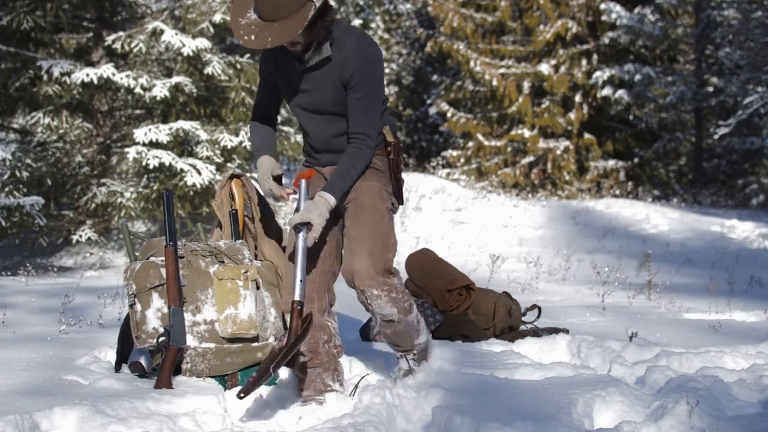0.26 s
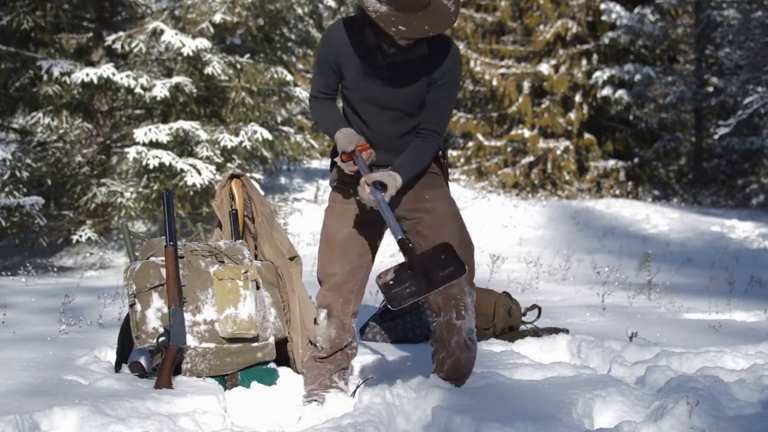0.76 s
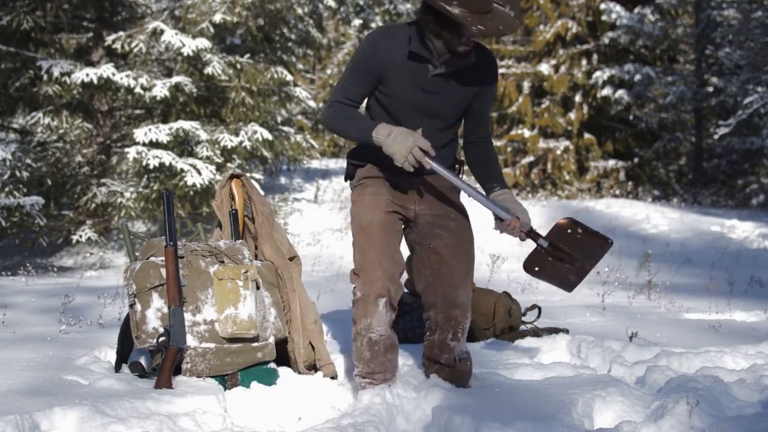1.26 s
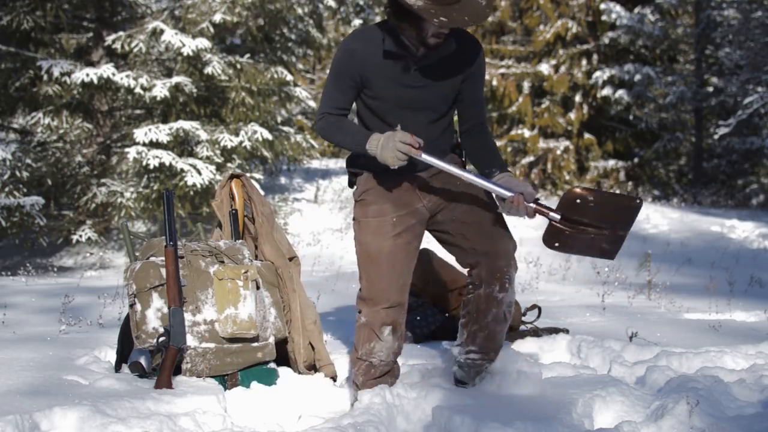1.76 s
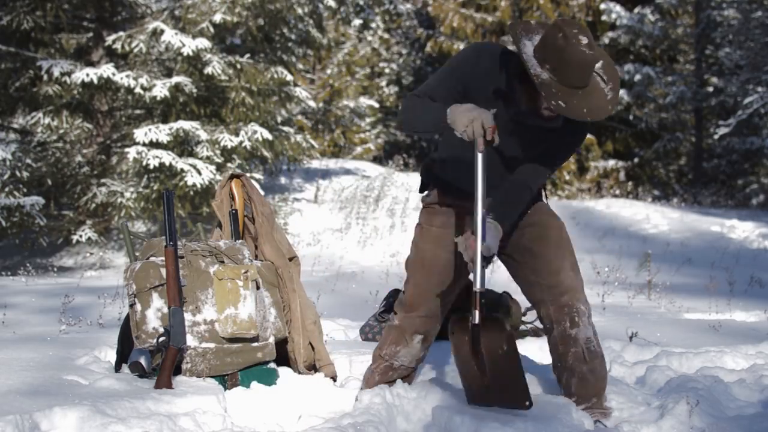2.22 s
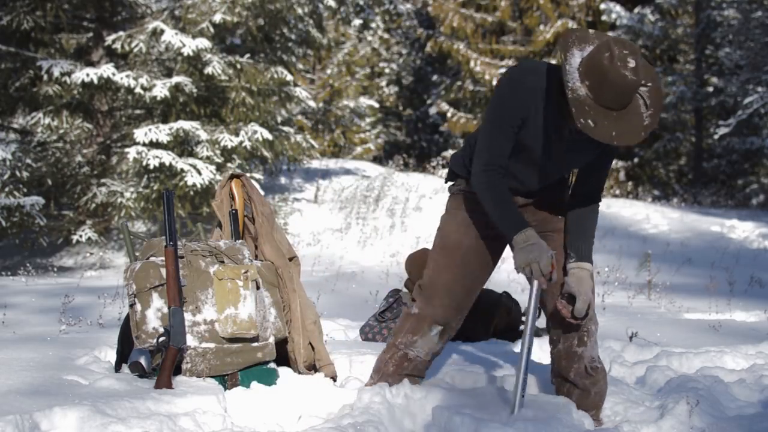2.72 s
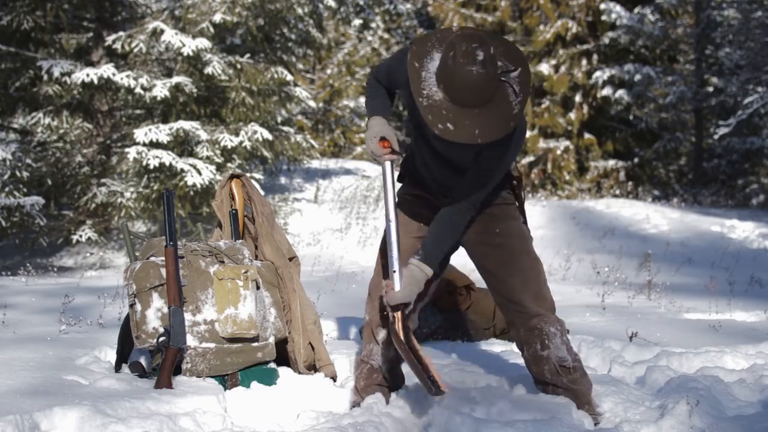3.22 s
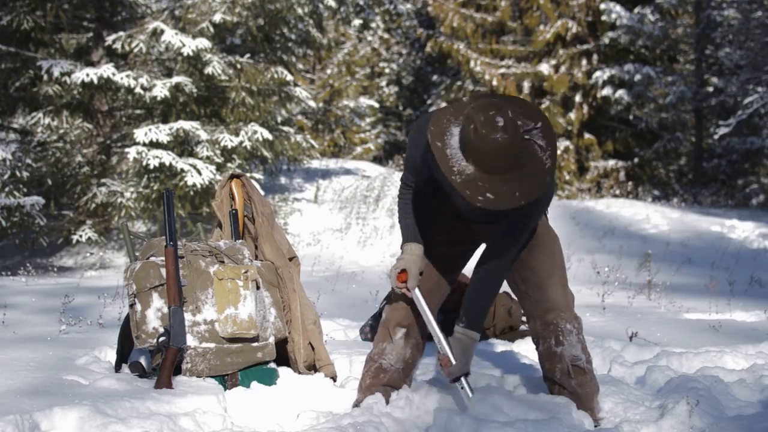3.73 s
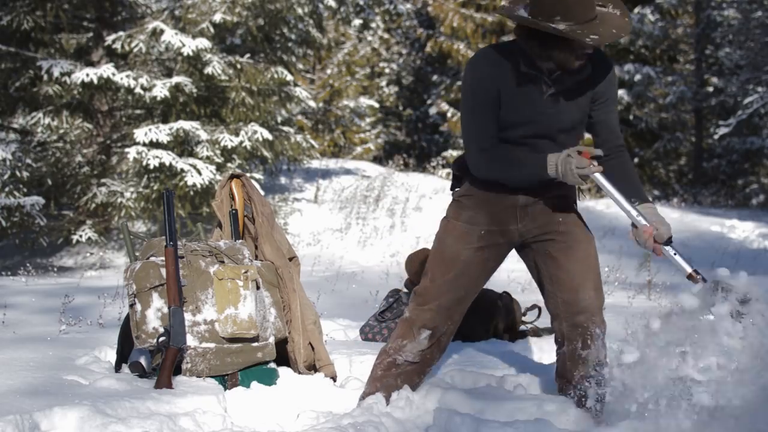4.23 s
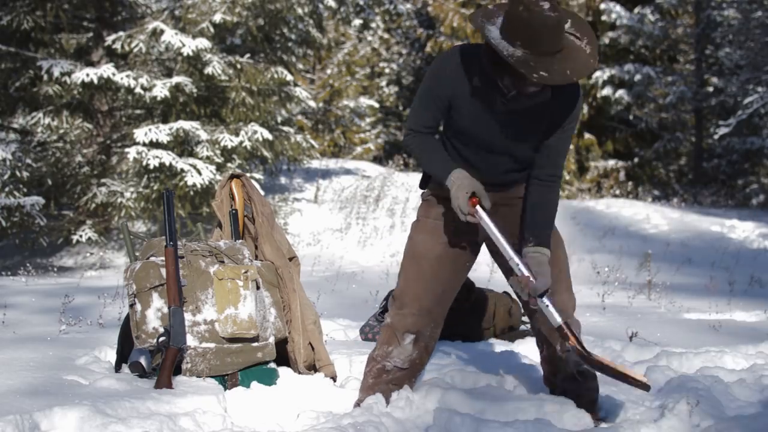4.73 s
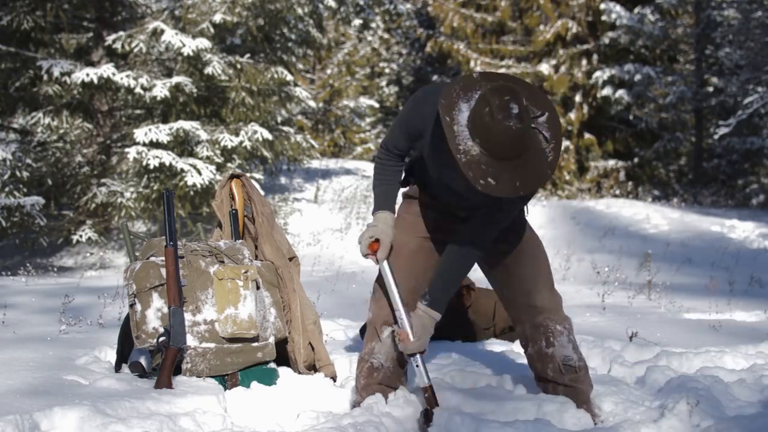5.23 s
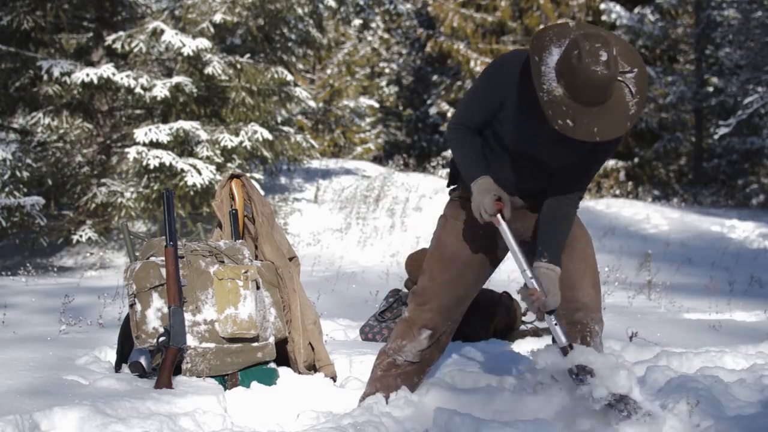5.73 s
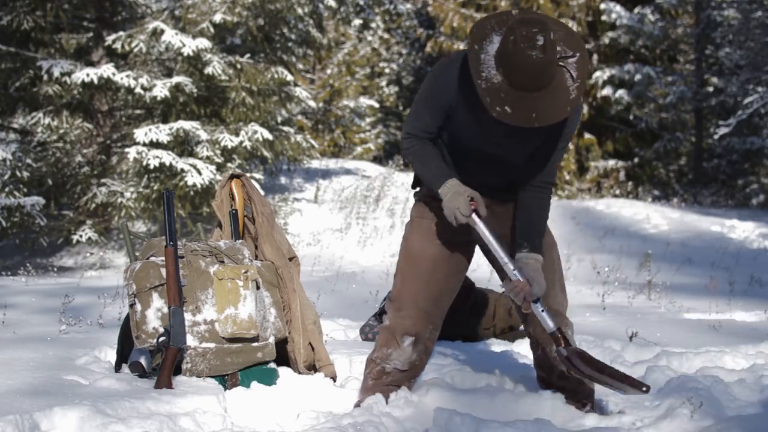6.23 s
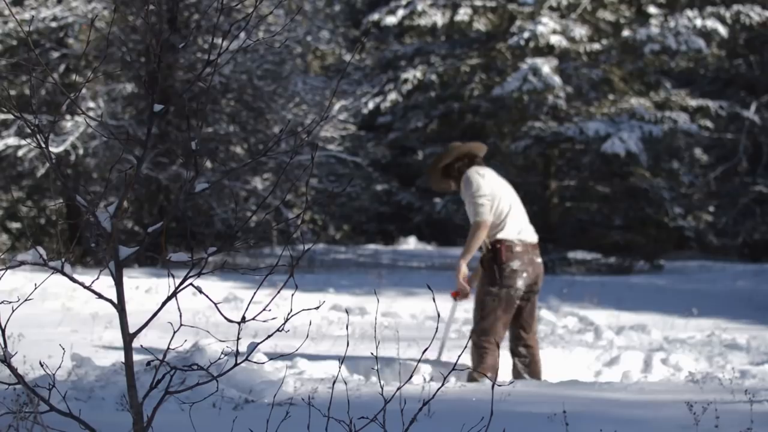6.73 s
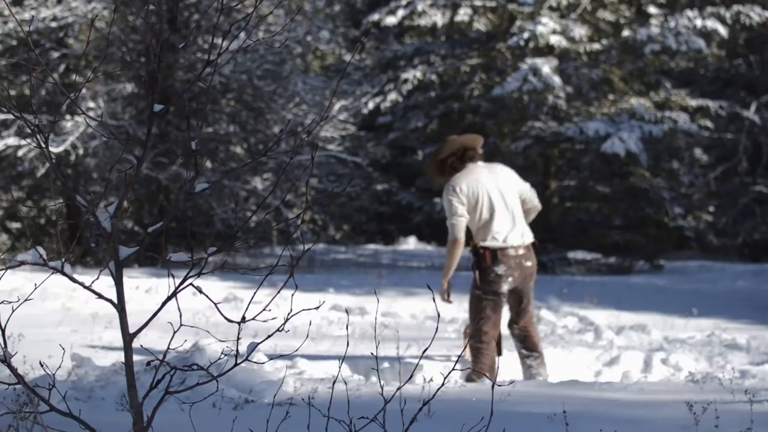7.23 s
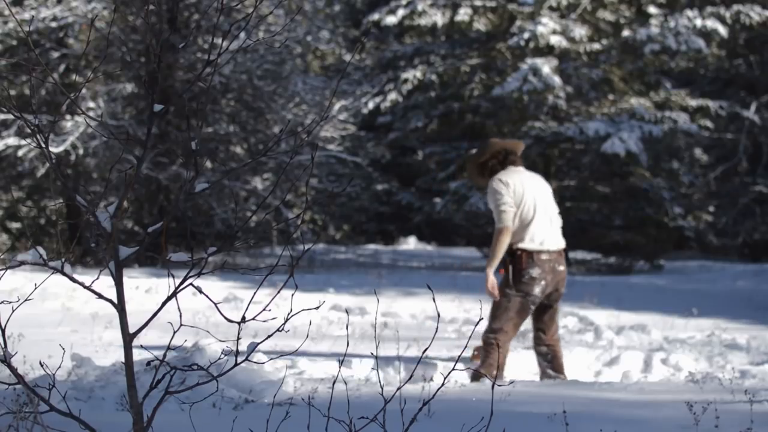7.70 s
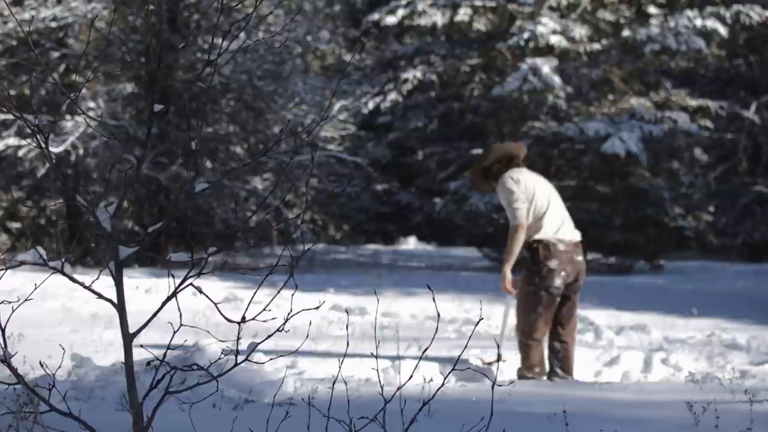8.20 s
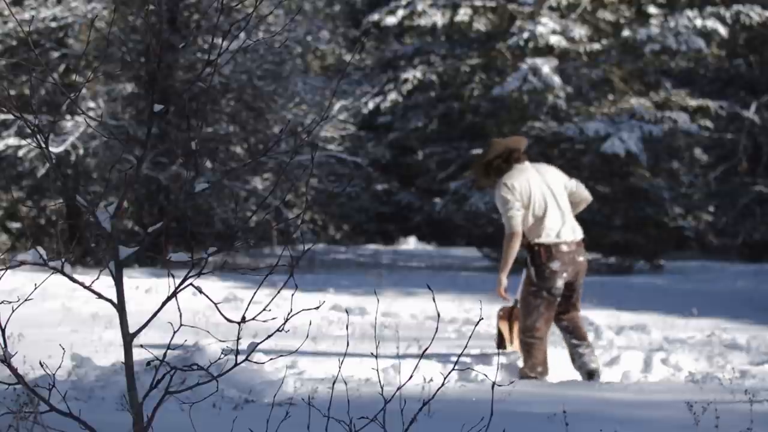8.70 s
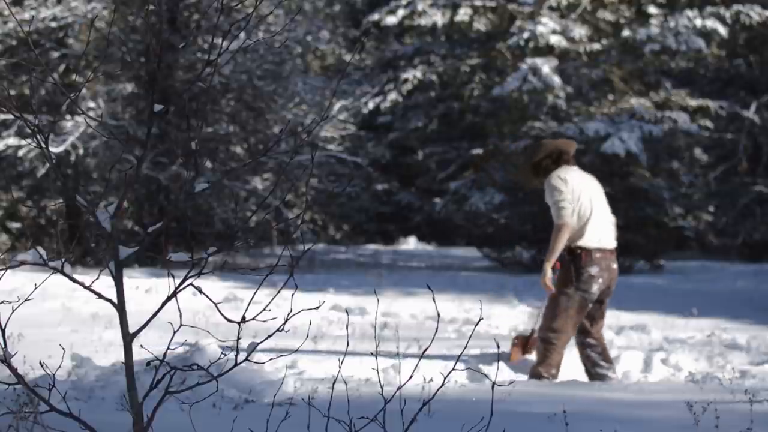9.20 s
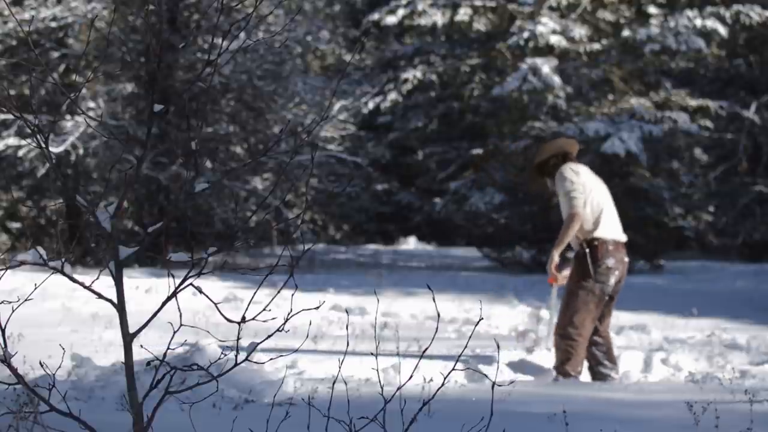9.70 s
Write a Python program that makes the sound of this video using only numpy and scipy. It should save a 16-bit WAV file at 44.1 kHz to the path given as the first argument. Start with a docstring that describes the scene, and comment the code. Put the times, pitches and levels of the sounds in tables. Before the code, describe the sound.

In a quiet snowy forest clearing, boots softly pack cold snow while a light metal shovel drags, ticks and rattles. Sharp stabs then break the crust with gritty snaps, dull thuds and hissing crystals. A load sprays off, a small bird trills briefly, another stab and throw follow, then five more stabs come at shorter intervals. Close, dry microphone with slight low wind buffeting and a very faint scattered echo.

```python
"""In still forest air, boots pack cold snow in soft lurches and a light metal shovel drags, ticks and rattles.
Then stabs break the crust in quick bursts of snapping grains, most ending in a dull, damped thud, and crystals
hiss along the faintly ringing blade. After the second stab a load slides off in a bright spray, a small bird
trills thinly and slurs down, and a third stab leads to a second throw. Five more stabs follow, while low lumpy
noise buffets the microphone; the work leaves a faint scattered echo throughout."""
import sys
import numpy as np
from scipy import signal
from scipy.fft import rfft, irfft, next_fast_len
from scipy.io import wavfile
from scipy.ndimage import uniform_filter1d

SR = 44100
rng = np.random.default_rng(int(sys.argv[2]) if len(sys.argv) > 2 else 0)


def store_wav(level_fs):
    """Save 16-bit WAV to argv[1]."""
    pcm = np.round(np.clip(np.atleast_2d(level_fs), -1, 1) * 32767)
    wavfile.write(sys.argv[1], SR, pcm.T.astype(np.int16))


N = 438794
TIME = np.arange(N) / SR  # seconds
BEATS = TIME[::32]  # coarse clock for slow movements, seconds

# the blade driven into the snow: (time [s], coarseness of the spot [dB], relative level of spilling crystals [dB],
# their dying time [s], relative level of snow packed under the blade [dB])
STABS = [(2.356, 2, -25, 0.023, -48.5), (3.481, -2, -27, 0.05, -42), (5.206, -0.5, -18.5, 0.055, -38),
         (6.662, 13, -38, 0.047, -53.5), (7.363, 4, -31.5, 0.084, -47.5), (8.184, -2, -29.5, 0.049, -46.5),
         (8.931, 0, -29, 0.044, -52), (9.62, 1.5, -29, 0.043, -48)]


def amp(db):
    """Decibels to gain."""
    return 10 ** (np.asarray(db) / 20)


def unit(x):
    """Scales to an rms of one."""
    return x / np.sqrt(np.mean(x ** 2) + 1e-20)


def add(mix, s, sound):
    """Mixes a sound in at a time in seconds."""
    part = mix[max(round(s * SR), 0):][:len(sound)]
    part += sound[:len(part)]


def band(x, low_hz, high_hz, order=2):
    """Band-pass filter."""
    edges = [low_hz, min(high_hz, SR / 2 - 1)]
    return signal.sosfilt(signal.butter(order, edges, "bandpass", fs=SR, output="sos"), x)


def colour(x, spectrum, size=4096):
    """Causal filter of unit energy with the given spectrum, so that attacks stay sharp."""
    hz, db = np.transpose(spectrum)
    grid_hz = abs(np.fft.fftfreq(size, 1 / SR)) + 1
    log_gain = np.log(amp(np.interp(np.log(grid_hz), np.log(hz), db)))
    # the Hilbert transform of the log gain gives the minimum phase
    minimum_phase = np.exp(np.conj(signal.hilbert(log_gain)))
    taps = np.fft.ifft(minimum_phase).real[:size // 2]
    return signal.oaconvolve(x, taps / np.linalg.norm(taps))[:len(x)]


def drift(rate_hz):
    """Slow random wander of rms one, fading out above the given rate."""
    size = next_fast_len(N, True)
    hz = np.fft.rfftfreq(size, 1 / SR)
    slow = rfft(rng.standard_normal(size)) * np.exp(-(hz / rate_hz) ** 2)
    return unit(irfft(slow, size)[:N])


def grains(per_s, spread_db, clump_db, clump_hz):
    """Ice bonds snapping: tiny clicks of uneven size, whose level swells in clumps."""
    snaps = (rng.random(N) < per_s / SR) * rng.choice([-1., 1.], N)
    size_db = spread_db * np.minimum(rng.exponential(1, N), 4)
    return unit(snaps * amp(size_db + clump_db * drift(clump_hz)))


def rasp(hiss, lumps_db=3.0, lumps_hz=70):
    """Lumps tumbling among the crystals make the midrange rasp unevenly."""
    lump_gain = amp(lumps_db * (np.clip(drift(lumps_hz), -2, 2) - 1.0))
    return hiss + band(hiss, 1100, 4000, order=1) * (lump_gain - 1)


def swell(s, db, rise_s, fall_s, roundness=(1, 1)):
    """Gain of one movement that builds up to a moment and dies away; roundness 1 is pointed, 2 a bell."""
    away = np.maximum((s - BEATS) / rise_s, (BEATS - s) / fall_s)
    away = np.minimum(away, 20)
    return amp(db) * np.exp(-away ** np.where(BEATS < s, *roundness))


def together(swells):
    """Gain at every sample of independent movements, which add in power."""
    return np.interp(TIME, BEATS, np.sqrt(sum(gain ** 2 for gain in swells)))


def blade(x, damping):
    """The metal sheet rings in modes that flutter as it flexes; snow against it damps every mode faster."""
    # modes of the blade: (frequency [Hz], relative level [dB], t60 at damping 1 [s])
    modes = [(550, 14, 0.067), (650, 7.5, 0.08), (780, -2.5, 0.36), (1159, -8.5, .2), (1282, 2.5, 0.057),
             (1510, 6.5, 0.045), (1645, -2, 0.074), (2000, -3, 0.23), (2230, -13, 0.071), (2650, -6.5, .25),
             (3690, -5, 0.04), (5560, 1.5, 0.06), (6115, 2.5, 0.08), (6750, 2, 0.04), (8470, -1, 0.035),
             (9030, -2, 0.0327)]
    t = TIME[:SR // 3]
    flutter = .002 * unit(uniform_filter1d(rng.standard_normal((len(modes), len(t))), 500))
    bent_t = t + np.cumsum(flutter, axis=1) / SR
    ring = np.zeros(len(t))
    for (hz, db, t60), bent in zip(modes, bent_t):
        ring += amp(db - 60 * t * damping / t60) * np.cos(2 * np.pi * hz * bent)
    return signal.oaconvolve(x, ring / np.linalg.norm(ring))[:len(x)]


def still_air(level_db=-55.5):
    """Steady coloured noise, the quiet bed of the clearing."""
    # spectrum of the still air: (frequency [Hz], relative density [dB per Hz])
    air_spectrum = [(20, -14.5), (55, -0.5), (110, -2), (400, -3), (800, -4), (2000, -8.5), (4000, -11),
                    (7500, -13), (9500, -11), (12000, -17), (16000, -18.5)]
    return amp(level_db) * colour(rng.standard_normal(N), air_spectrum)


def gusts(gain_db=0.5, top_hz=88):
    """Wind on the microphone: lumpy low buffeting."""
    # short puffs: (middle [s], relative level [dB], half length [s])
    puffs = [(6.945, -45, 0.023), (7.005, -31, 0.0092), (7.052, -40, 0.021), (8.69, -43, 0.023),
             (8.842, -55, 0.072), (9.568, -45, .026)]
    strength = together([swell(s, db, half_s, half_s, (2, 2)) for s, db, half_s in puffs])
    return amp(gain_db) * strength * unit(band(rng.standard_normal(N), 27, top_hz, order=3))


def twitter(sweep_hz=380, trill_hz=60, pulse_depth=0.75, trill_end_s=4.76):
    """A small bird's thin whistle pulses and sweeps in a fast trill, then slurs down smoothly."""
    # course of the call: (time [s], level before pulsing [dB], pitch before sweeping [Hz])
    call = [(4.51, -63, 5200), (4.62, -59.5, 5200), (4.699, -64, 5400), (4.765, -63, 4900),
            (4.785, -58.5, 4650), (4.825, -69.5, 4450)]
    s, db, hz = np.transpose(call)
    beat = 2 * np.pi * trill_hz * TIME
    trilling = TIME < trill_end_s
    pitch_hz = np.interp(TIME, s, hz) + sweep_hz * trilling * np.sin(beat)
    turns = np.cumsum(pitch_hz) / SR
    calling = (TIME > s[0]) * (TIME < s[-1])
    pulses = 1 - pulse_depth * trilling * np.cos(beat)
    return amp(np.interp(TIME, s, db)) * calling * pulses * np.sin(2 * np.pi * turns)


def trees(x, t60=0.532, delay_s=0.021):
    """Trunks scatter an echo back across the snow: sparse random reflections that die away."""
    t = TIME[:SR]
    taps = rng.standard_normal(SR) * (rng.random(SR) < 2000 / SR) * (t > delay_s)
    tail = band(taps, 300, 6000, order=1) * amp(-60 * t / t60)
    return signal.oaconvolve(x, tail / np.linalg.norm(tail))[:N]


def swishes():
    """A sleeve brushes past: fine weave rubbing on weave gives a narrow, high whisper."""
    # brushes of the sleeve: (time [s], level [dB], length [s])
    strokes = [(1.041, -47.5, 0.2), (1.871, -52, 0.13), (3.426, -45, 0.072)]
    strength = np.zeros(N)
    for s, db, length_s in strokes:
        add(strength, s, amp(db) * signal.windows.tukey(round(length_s * SR), .6))
    return strength * unit(band(rng.standard_normal(N), 7800, 10200, order=2))


def clicks(top_hz=6300, ring_db=-11, damping=2):
    """Play in the shaft joint: a bright tick that runs down into the blade."""
    # ticks of the joint: (time [s], level [dB], lower edge [Hz], dying time [s])
    joint_ticks = [(1.2501, -36.5, 1500, 0.0066), (1.869, -46, 2700, 0.0055), (2.004, -44, 1900, 0.0036),
                   (3.233, -37, 1910, 0.012), (6.203, -41, 3800, .004), (6.8165, -26.5, 4000, 0.0021),
                   (8.402, -36.5, 3480, 0.0036), (8.893, -29, 4500, 0.0034), (9.537, -32.5, 3040, 0.005)]
    ticks, t = np.zeros(N), TIME[:SR // 20]
    for s, db, low_hz, die_s in joint_ticks:
        noise = band(rng.standard_normal(len(t)), low_hz, max(top_hz, low_hz + 100), order=1)
        add(ticks, s, amp(db) * unit(noise) * np.exp(-t / die_s))
    return ticks + amp(ring_db) * blade(ticks, damping)


def knocks(scuff_db=-4, body_db=-13, gain_db=2):
    """Gloves and lumps of snow jolt the free blade with a short scuffing blow that has a dull body."""
    # blows in the open air: (time [s], relative level [dB], centre [Hz], dying time [s])
    jolts = [(.2395, -40.5, 4000, 0.0046), (.252, -48, 1420, 0.0089), (.26, -43, 2680, 0.0081),
             (1.353, -42.5, 1120, 0.0056), (1.832, -51, 660, 0.0039), (1.937, -51, 734, 0.0052),
             (1.94, -48.5, 3050, 0.011), (3.252, -35.5, 1580, 0.0022), (4.636, -53.5, 573, 0.0034),
             (6.92, -40.5, 1560, 0.0036), (7.782, -40.5, 1710, 0.0066), (9.866, -50, 1790, 0.0033),
             (9.92, -44.5, 1260, 0.0059)]
    blows, t = np.zeros(N), TIME[:SR // 10]
    for s, db, hz, die_s in jolts:
        scuff, body = rng.standard_normal((2, len(t)))
        scuff = unit(band(scuff, hz / 1.31, hz * 1.27))
        body = unit(band(body, 480, 1600))
        add(blows, s, amp(db) * (scuff + amp(body_db) * body) * np.exp(-t / die_s))
    return amp(gain_db) * (blade(blows, 1.0) + amp(scuff_db) * blows)


def thuds(overtone=1.6, overtone_db=-5, grit_db=-7):
    """A boot or the blade stops on firm snow: a heavily damped push with a little low grit."""
    # stops on firm snow: (time [s], relative level [dB], pitch [Hz], dying time [s])
    stops = [(1.44, -50.5, 130, .03), (2.429, -32.5, 111, 0.0088), (3.568, -14.5, 496, 0.0051),
             (6.663, -40.5, 243, 0.017), (7.440, -27, 235, 0.003), (8.2433, -17.5, 242, 0.0053),
             (9.004, -25.5, 277, 0.0041), (9.688, -17, 249, 0.0051)]
    out, t = np.zeros(N), TIME[:SR // 10]
    for s, db, hz, die_s in stops:
        push = np.sin(2 * np.pi * hz * t)
        push += amp(overtone_db) * np.sin(2 * np.pi * hz * overtone * t)
        grit = amp(grit_db) * unit(band(rng.standard_normal(len(t)), hz / 2, 2100))
        add(out, s, amp(db) * band((push + grit) * np.exp(-t / die_s), hz / 2, 3000))
    return out


def packing(after_s=0.045, rise_s=0.025, die_s=0.12, gain_db=2):
    """Under each stab and tread deeper snow collapses in small lurches, muffled by the snow above it."""
    # weight shifting onto a boot or the blade: (heaviest moment [s], relative level [dB], half length [s])
    shifts = [(0.037, -58.5, 0.077), (0.761, -52.5, 0.11), (1.02, -49, 0.047), (1.114, -51, .15),
              (1.467, -51, 0.14), (2.077, -54.5, 0.3), (2.598, -46, 0.04), (2.768, -48, 0.13),
              (2.966, -39.5, 0.018), (3.598, -33, 0.035), (3.795, -51, 0.29), (4.004, -52, 0.029),
              (5.34, -37.5, .03), (5.483, -51.5, 0.31), (7.55, -52.5, 0.17)]
    # muffled spectrum of deeper snow: (frequency [Hz], relative density [dB per Hz])
    packed_spectrum = [(30, -15), (100, -6), (280, -3), (550, 0.5), (850, 1.5), (1600, -1.5), (3000, -7),
                       (7000, -14.5), (14000, -33)]
    # roundness of (weight coming on, snow settling)
    tread_roundness = (1.6, 2)
    pushes = [swell(s + after_s, db, rise_s, die_s) for s, *_, db in STABS]
    treads = [swell(s, db, half_s, half_s, tread_roundness) for s, db, half_s in shifts]
    lurches = grains(per_s=4000, spread_db=2.6, clump_db=2.2, clump_hz=60)
    return amp(gain_db) * colour(lurches * together(pushes + treads), packed_spectrum)


def throws(release_s=0.014, body_db=-11, ring_db=0):
    """A load slides ever faster and leaves the lip in a bright spray; the blade rings from about then."""
    # loads flung off: (start [s], level of the hiss at the release [dB], time sliding [s], blade damping [factor])
    loads = [(4.245, -26.5, 0.19, 0.81), (5.861, -29.5, 0.15, 2.8)]
    out, t = np.zeros(N), TIME[:SR // 2]
    lumps = rasp(unit(band(rng.standard_normal(N), 680, 4100)))
    for s, db, slide_s, damping in loads:
        speed = np.minimum(t / slide_s, 1) * np.exp(-np.maximum(t - slide_s, 0) / release_s)
        strength = amp(db) * speed
        hiss = strength * unit(band(rng.standard_normal(len(t)), 5100, 9150, order=3))
        body = strength * lumps[round(s * SR):][:len(t)]
        freed = t > slide_s - release_s
        ring = blade(band(body * freed, 1400, 2500), damping)
        add(out, s, hiss + amp(body_db) * (body + amp(ring_db) * ring))
    return out


def sliding(spill_after_s=0.029, spill_rise_s=0.03, ring_db=-6, crumbs_db=-17, gain_db=-1):
    """Crystals hiss along the metal in every stab and drag and make it sing; coarse crumbs patter among them."""
    # the blade drawn through or out of loose snow:
    # (fastest moment [s], relative level [dB], speeding up [s], slowing down [s])
    strokes = [(0.205, -42.5, 0.13, 0.088), (1.349, -52.5, 0.32, 0.27), (2.605, -42, 0.027, 0.026),
               (2.77, -53, 0.21, .08), (3.061, -29.5, 0.07, 0.093), (3.92, -52.5, 0.46, 0.8),
               (4.358, -36.5, 0.08, 0.13), (5.08, -48, 0.054, 0.28), (5.56, -35.5, 0.049, 0.014),
               (5.74, -38, 0.14, 0.052), (5.979, -28, 0.073, 0.058), (6.479, -50.5, 0.062, 0.065),
               (6.95, -35.5, 0.073, 0.047), (7.789, -40.5, 0.049, 0.094), (8.51, -38, 0.081, 0.091),
               (9.291, -36.5, 0.094, 0.065), (9.585, -36.5, 0.017, 0.03), (9.88, -38, 0.057, 0.067)]
    # spectrum of loose crystals on metal: (frequency [Hz], relative density [dB per Hz])
    crystal_spectrum = [(100, -47), (380, -31), (600, -32.5), (1000, -12.5), (1600, -14), (2700, -5.5),
                        (4000, -1), (6500, -3), (9400, 1.5), (10600, -2.5), (12000, -11), (15500, -25)]
    # roundness of (speeding up, leaving the snow)
    drag_roundness = (1.8, 1.86)
    spills = [swell(s + spill_after_s, db, spill_rise_s, die_s, (2, 1)) for s, _, db, die_s, _ in STABS]
    drags = [swell(*stroke, drag_roundness) for stroke in strokes]
    flow = together(spills + drags)
    crystals = grains(per_s=14000, spread_db=3.0, clump_db=1.0, clump_hz=117.0)
    hiss = rasp(colour(crystals * flow, crystal_spectrum))
    crumbs = unit(band(grains(per_s=200, spread_db=2, clump_db=2, clump_hz=20), 1300, 2100))
    snow = hiss + amp(crumbs_db) * crumbs * flow
    return amp(gain_db) * (snow + amp(ring_db) * blade(snow, damping=2.6))


def coarseness(s):
    """Extra midrange in dB of a crunch: fine crust on top, coarse snow below, loose clods afterwards."""
    # coarseness as the blade goes deeper: (time since the stab [s], extra midrange [dB])
    depths = [(0, -1), (.03, 3.5), (.055, 12), (.09, 13), (.25, 9.5)]
    # the latest stab, or one just about to start
    start, spot_db = [stab for stab in STABS if stab[0] < s + .01][-1][:2]
    age_s, db = np.transpose(depths)
    return np.interp(s - start, age_s, db) + spot_db * (s - start < age_s[-1])


def crunches(hold_share=0.91, rise_s=0.00057, ring_db=-8, damping=6.39, linger_db=-19, linger_s=0.02, gain_db=-1):
    """The crust gives way in bursts of snapping grains, and crumbs keep breaking behind each burst."""
    # the snow giving way: (time [s], relative level [dB], length [s]);
    # each holds for a share of its length, then dies with that length as time constant
    breaks = [(2.361, -18, 0.0082), (2.365, -2, 0.0028), (2.3856, -8, 0.0035), (2.415, -33, 0.0054),
              (2.951, -40, 0.018), (3.017, -34.5, 0.006), (3.482, -22, 0.01), (3.493, -10.5, 0.012),
              (3.533, -27, 0.0034), (3.566, -29.5, 0.015), (5.205, -17.5, 0.015), (5.223, -26, 0.023),
              (5.276, -21, 0.012), (5.299, -28.5, 0.0095), (5.315, -34, 0.013), (5.563, -32, 0.011),
              (5.667, -35.5, 0.016), (5.702, -32.5, 0.0035), (6.665, -39.5, 0.018), (6.963, -36, 0.0097),
              (7.357, -30.5, 0.0054), (7.3645, -21.5, 0.0095), (7.396, -20.5, 0.005), (7.4386, -23, 0.0022),
              (7.729, -45.5, 0.014), (8.182, -25, 0.0041), (8.1885, -13, 0.0049), (8.2145, -10.5, 0.0038),
              (8.24, -23, 0.0055), (8.85, -41, 0.023), (8.9307, -23, 0.0016), (8.9354, -15.5, 0.0058),
              (8.958, -18.5, 0.0079), (9.548, -33, 0.0053), (9.622, -18.5, 0.0065), (9.651, -14.5, 0.0037)]
    # spectrum of breaking crust: (frequency [Hz], relative density [dB per Hz])
    crust_spectrum = [(60, -32.5), (300, -18), (600, -21.5), (1000, -10.5), (1500, -6.5), (2400, -6.5),
                      (4500, -2.5), (7000, -0.5), (9300, 3.5), (10700, -1), (12000, -11.5), (15500, -24.5)]
    fine, coarse, t = np.zeros(N), np.zeros(N), TIME[:SR // 4]
    for s, db, length_s in breaks:
        after = np.maximum(t - hold_share * length_s, 0)
        crumbling = amp(linger_db) * np.exp(-after / linger_s)
        fall = np.hypot(np.exp(-after / length_s), crumbling)
        burst = amp(db) * (1 - np.exp(-t / rise_s)) * fall
        add(fine, s, burst)
        add(coarse, s, burst * (amp(coarseness(s)) - 1))
    snaps = grains(per_s=24000, spread_db=1.8, clump_db=1.3, clump_hz=600)
    # larger pieces of crust break less often and add a gritty midrange
    pieces = unit(snaps + .8 * grains(per_s=1400, spread_db=2.2, clump_db=2, clump_hz=200))
    grit = band(pieces * coarse, 404, 3000, order=1)
    snow = colour(snaps * fine + grit, crust_spectrum)
    return amp(gain_db) * (snow + amp(ring_db) * blade(snow, damping))


def shifting(x, patchy_db=2.5, patch_hz=330, patch_s=0.015):
    """Lumps and hollows shift around the blade, so the colour of the snow wanders in small patches."""
    hz, t, z = signal.stft(x, SR, nperseg=256, noverlap=192)
    patches = rng.standard_normal((len(t), len(hz))).T
    # smooth across frequency, then across time
    for axis, share in enumerate([hz[1] / patch_hz, t[1] / patch_s]):
        patches = signal.filtfilt([1], [1, -np.exp(-2 * share)], patches, axis=axis, padtype="even")
    gain = amp(patchy_db * np.clip(unit(patches), -2, 2))
    return signal.istft(z * unit(gain), SR, nperseg=256, noverlap=192)[1][:N]


def scene(echo_db=-30):
    """The still air, wind and bird around the digging and its echo."""
    snow = shifting(crunches() + sliding() + throws() + packing())
    work = snow + thuds() + knocks() + clicks() + swishes()
    echo = amp(echo_db) * trees(work)
    return (still_air() + gusts() + twitter() + echo + work)[None]


def record(dry, cutoff_hz=15900):
    """Peaks beyond full scale overload the recorder and clip; then a low-pass limits the band."""
    clipped = np.clip(dry, -1, 1)
    lowpass = signal.firwin(511, cutoff_hz, window=("kaiser", 9), fs=SR)
    return signal.oaconvolve(clipped, lowpass[None], "same")


dry = scene()
out = record(dry)
store_wav(out)
```